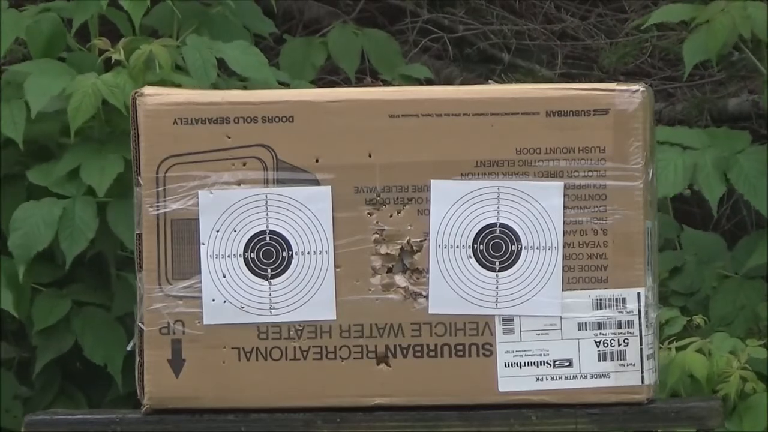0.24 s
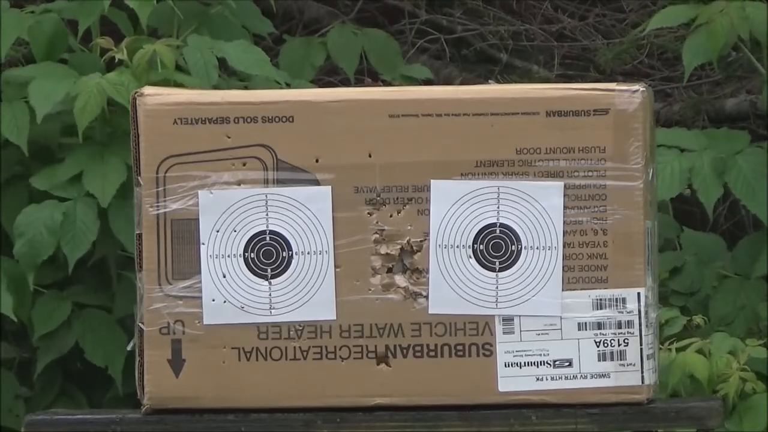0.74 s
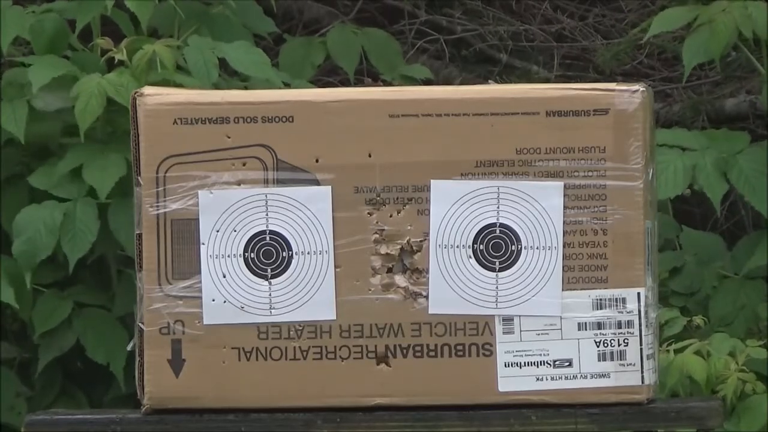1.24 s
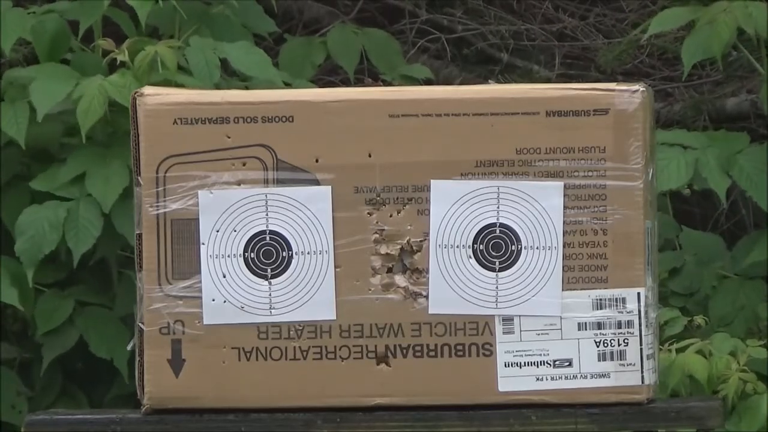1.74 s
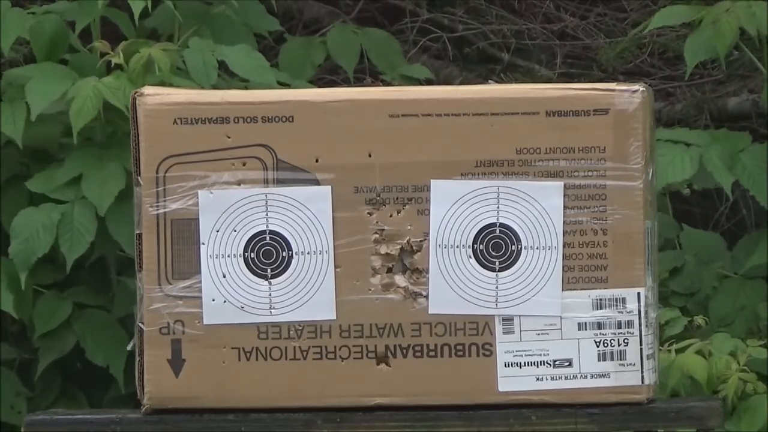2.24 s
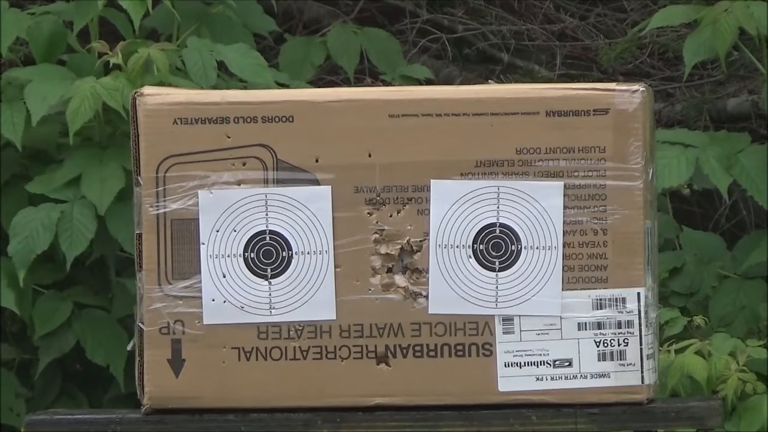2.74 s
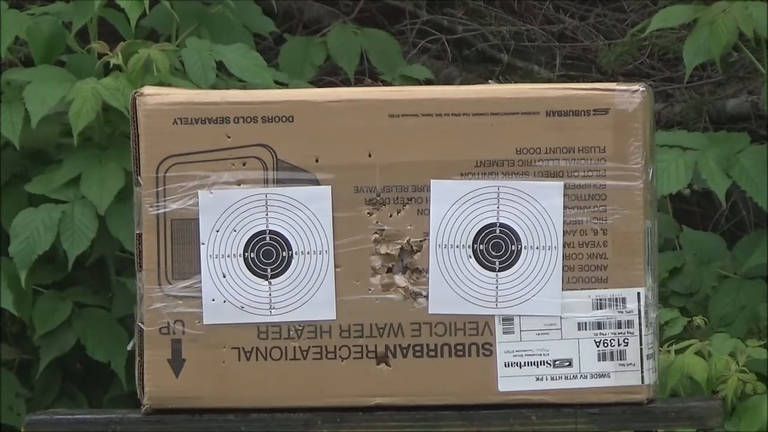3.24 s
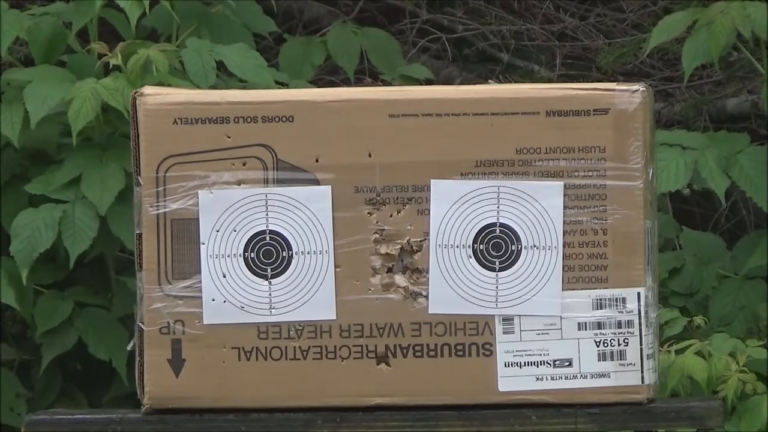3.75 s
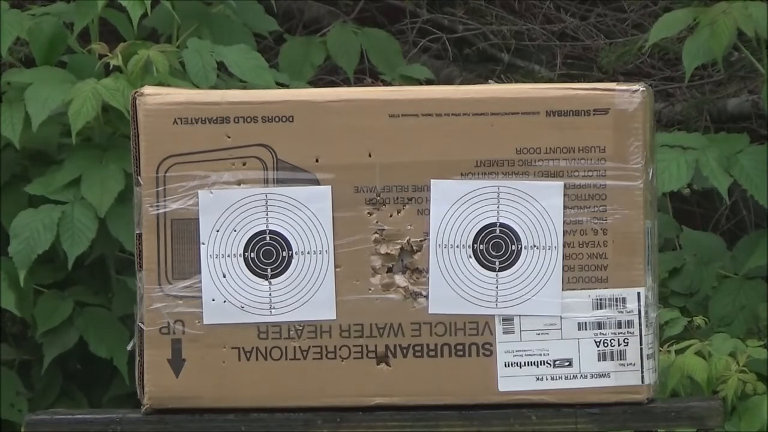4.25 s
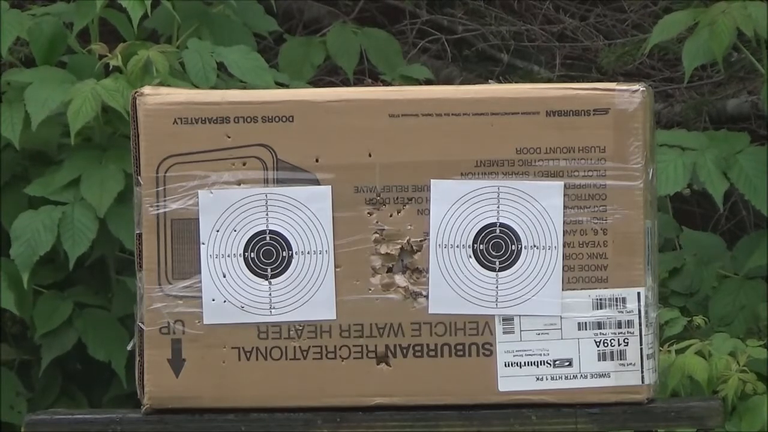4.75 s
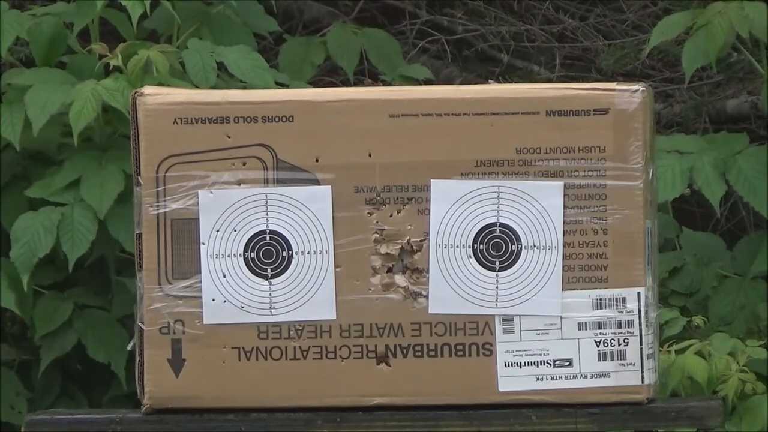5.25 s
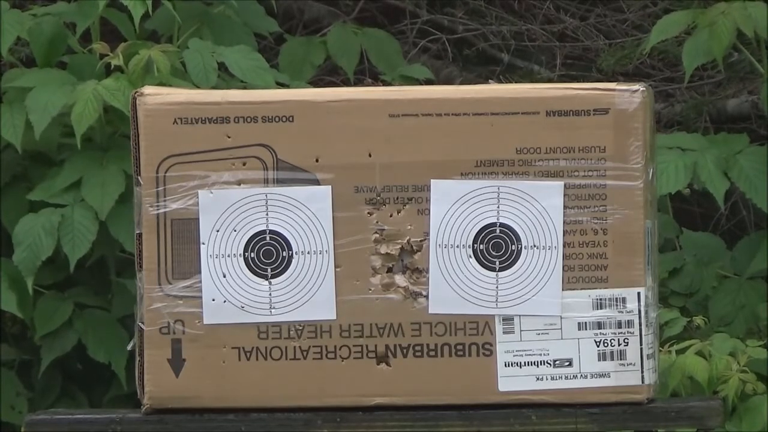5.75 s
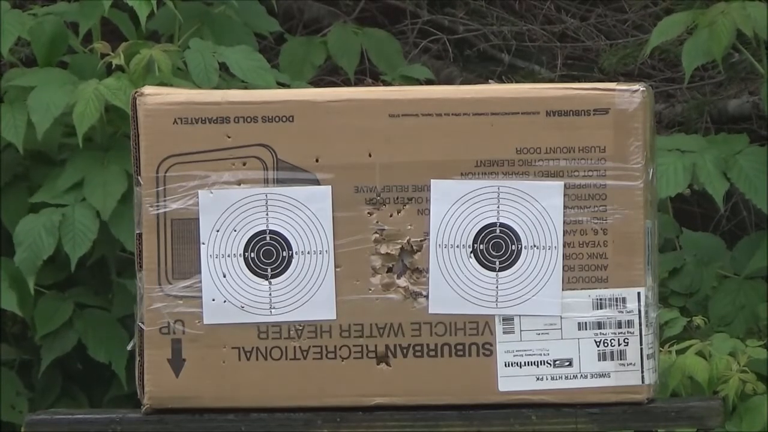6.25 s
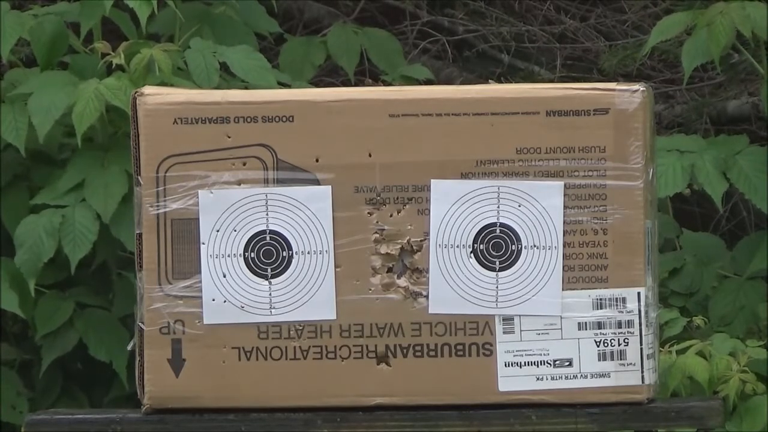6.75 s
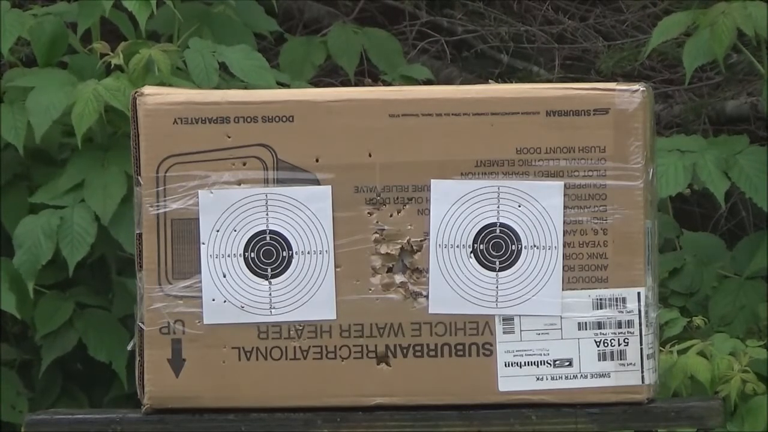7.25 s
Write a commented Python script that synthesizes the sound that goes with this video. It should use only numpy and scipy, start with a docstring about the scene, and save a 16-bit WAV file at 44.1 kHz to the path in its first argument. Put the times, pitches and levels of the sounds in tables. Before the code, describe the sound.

A gas BB gun, heard close up, shoots six times at a cardboard box outdoors: three steady shots, a pause, then three faster ones. Each goes from a small trigger click to a crisp pop of gas and steel, then a hard cardboard smack that echoes briefly off a wall and trees. Light trigger clacks and a faint hush of distant trees fill the gaps.

```python
"""A gas BB gun, close by, fires at a cardboard box in a leafy garden. An earlier shot dies away; six follow.
Each time the trigger clicks, the hammer lets go and strikes the valve, gas pops from the muzzle and the
hammer bounces. The BB slaps the box, a wall on the left returns the slap, and the trigger clacks back.
Nearby surfaces echo, leaves and trees scatter the sound, and a faint hush fills the gaps."""
import sys
import numpy as np
from scipy import signal
from scipy.fft import rfft, irfft, next_fast_len
from scipy.io import wavfile
from scipy.ndimage import uniform_filter1d, minimum_filter1d, map_coordinates

SR = 44100
rng = np.random.default_rng(int(sys.argv[2]) if len(sys.argv) > 2 else 0)


def transcribe(u):
    """Save the signal u as a 16-bit wav file named by the first command-line argument.

    u: samples, shape (n,) or (channels, n), limited to [-1, 1]; the rate is SR.
    q: integer samples, one column per channel.
    """
    v = np.clip(np.atleast_2d(u).T, -1, 1)
    q = np.round(v * 32767).astype(np.int16)
    wavfile.write(sys.argv[1], SR, q)


N = 331191

# Each BB hits another spot. Each row: report time in seconds, slap gain in dB, hollow panel boost in dB,
# stiff face boost in dB, paper snap in Hz, top boost in dB, gain to the wall in dB, its face boost in dB.
SHOTS = [(-.1237, 2.5, -4, -5, 4960, 6.5, 2.5, -13), (1.5942, 4, 3, 6.5, 6170, 9.5, 2, 9),
         (2.5885, 4.5, 1.5, 6, 6270, 3, 5, 5), (3.6285, 3.5, 5.5, 1, 10900, 11.5, 4, 2.5),
         (6.0773, 2, 8, 6, 5540, 12, 3.5, -6), (6.7524, 6, 5, 6, 4400, 7, 7.5, -5),
         (7.42, 5, 4, 0, 6000, 4, 4, -6)]
# Hammer release, valve strike, gas in the barrel, report, settling.
# Each row: lag from the report in seconds, steel in dB, gas in dB, t60 in seconds.
FIRING_CYCLE = [(-.0165, -21, -16, .07), (-.0058, -6.5, -24, .004), (-.0032, -12, -9, .018),
                (0, 0, -6, .001), (.0638, -28, -17, .007)]
# Body and barrel. Each row: frequency in Hz, relative energy in dB, t60 in seconds.
GUN_MODES = [(600, -18, .09), (1260, -22, .08), (1580, -16, .08), (2235, -19, .06), (5235, -22, .08),
             (6790, -17, .07), (7635, -17, .07), (8218, -11, .07), (8790, -12, .07), (9470, -17, .06),
             (10285, -18, .06)]
# Steel contact, gas puff, near and far scatter. Each row: frequency in Hz, relative level in dB.
STEEL_SPECTRUM = [(100, -27), (1500, -19), (4000, -13), (5200, -3.5), (7000, -1), (8300, -0.5),
                  (10300, -1.5), (12000, -9), (13500, -24), (16000, -27)]
GAS_SPECTRUM = [(30, -23), (150, -20.5), (320, -13.5), (620, 2.5), (850, -3), (1500, 3.5), (1900, -1.5),
                (2300, 0.5), (3200, -1.5), (4200, -10.5), (8000, -9), (15000, -28)]
NEAR_SPECTRUM = [(100, -32.5), (500, -8), (1200, -13.5), (3000, 1), (4500, 3), (8500, 10), (10500, 6),
                 (12500, -0.5), (16000, -28)]
FAR_SPECTRUM = [(60, -65), (200, -16), (450, -16), (1000, 3.5), (2300, 5.5), (3800, 1), (6000, -1.5),
                (9000, -11.5), (12000, -26), (16000, -12)]

def firing(gain_db=6):
    """Steel contacts and gas puffs ring the gun; returns direct sound and scatter."""
    direct, tails = np.zeros(N), np.zeros((2, N))
    for s, *_ in SHOTS:
        for lag_s, steel_db, gas_db, t60 in FIRING_CYCLE + hammer_bounces():
            steel = amp(steel_db) * colour(burst(t60), STEEL_SPECTRUM)
            gas = amp(gas_db) * colour(burst(t60), GAS_SPECTRUM)
            add(direct, s + lag_s, amp(gain_db) * (steel + gas))
        add(direct, s, amp(gain_db - 1) * ring(GUN_MODES))
        add(tails, s - .004, amp(gain_db - 3.5) * scatter(NEAR_SPECTRUM, .00038, t60=.26, side_db=-9))
        add(tails, s, amp(gain_db - 8) * scatter(FAR_SPECTRUM, .072, t60=.41, side_db=-6.5))
    return direct, tails

def hammer_bounces(first_s=.0062, gap_s=.0154, shrink=.615, loss_db=5, steel_db=-6.5, gas_db=-10):
    """The hammer rebounds, each time sooner and softer; rows as in FIRING_CYCLE."""
    rows = []
    for k in range(4):
        lag_s = first_s + gap_s * (1 - shrink ** k) / (1 - shrink)
        rows.append((lag_s, steel_db - loss_db * k, gas_db - loss_db * k, .0021))
    return rows

# Each row: time of a pull in seconds, gain in dB.
TRIGGER_PULLS = [(1.061, -20), (2.2183, -22), (3.4517, -22.5), (5.6067, -21), (6.6921, -22.5),
                 (7.3469, -22.5)]
# Each entry: time of the spring's return in seconds.
TRIGGER_RESETS_S = [.1127, 1.8023, 2.8275, 3.8678, 6.3164, 6.9719]
# Steel ping. Each row: frequency in Hz, relative energy in dB, t60 in seconds.
TRIGGER_MODES = [(2110, -12, 0.025), (2430, -14, 0.016), (5520, -11, 0.025), (7380, -7, 0.04)]
# Pull and return. Each row: frequency in Hz, relative level in dB.
PULL_SPECTRUM = [(100, -37), (450, -43), (650, 0), (900, -8), (1800, -2), (2200, 3), (2900, -2.5),
                 (5150, -3), (5700, 8), (6200, -1), (7300, 2.5), (10500, 1.5), (12500, -9), (16000, -27)]
SPRING_SPECTRUM = [(100, -39), (600, -14), (950, -13), (1200, 5), (1600, -8.5), (2600, 1), (4000, -10),
                   (5500, -7.5), (9000, -6.5), (12000, -19), (16000, -41)]

def trigger():
    """The trigger scrapes, clicks and pings, then springs back with a duller clack."""
    direct, tails = np.zeros(N), np.zeros((2, N))
    for s, db in TRIGGER_PULLS:
        add(direct, s - .004, amp(db - 4.5) * colour(burst(.034, rise_s=.0036), PULL_SPECTRUM))
        add(direct, s - .0007, amp(db + 10.5) * colour(burst(.028, rise_s=.0025), PULL_SPECTRUM))
        add(direct, s + .0006, amp(db + 9.5) * ring(TRIGGER_MODES))
        add(tails, s, amp(db + 2) * scatter(NEAR_SPECTRUM, .00095, t60=.17))
    for s in TRIGGER_RESETS_S:
        add(direct, s, amp(-15) * colour(burst(.029, rise_s=.0007), SPRING_SPECTRUM))
    return direct, tails

# Each row: delay in seconds, bass in dB, treble in dB, smear t60 in seconds.
GUN_ECHOES = [(.0014, -19.5, -5, 0.0019), (.034, -12.5, -33, 0.058), (.0418, -21, -14.5, 0.058)]

def gun():
    """Firing and trigger, with echoes from the bench and walls."""
    shots, shot_tails = firing()
    clicks, click_tails = trigger()
    direct, echoes = shots + clicks, np.zeros(N)
    for delay_s, bass_db, treble_db, t60 in GUN_ECHOES:
        reflection = shelves(burst(t60), bass_db, treble_db, split_hz=3400)
        add(echoes, delay_s, signal.fftconvolve(direct, reflection))
    tails = shot_tails + click_tails
    return spread(direct, direct, side_db=-51) + spread(echoes, echoes, side_db=-31) + tails

# Box panels. Each row: frequency in Hz, relative energy in dB, t60 in seconds.
PANEL_MODES = [(830, -60, 0.031), (1028, -14.5, 0.02), (1210, -35, 0.075), (1565, -10, 0.0032),
               (2070, -33, 0.0083)]
# Cardboard impact and leaf scatter. Each row: frequency in Hz, relative level in dB.
BOX_SPECTRUM = [(30, -29), (130, -19), (260, -6.5), (520, -16.5), (750, -8.5), (1020, -1.5), (1450, 6),
                (1780, -5.5), (2350, 4), (3500, -4), (4800, 4.5), (7000, 0), (10500, -7.5), (13000, -14),
                (15500, -23)]
LEAF_SPECTRUM = [(100, -29.5), (300, 2), (550, -10), (1200, -4), (3500, -2), (6000, 8), (9000, 4),
                 (12000, -13), (16000, -30)]

def box(flight_s=.0912, slowing_s=.00087):
    """The BB snaps and drums the cardboard; leaves, trees and the wall throw the slap back."""
    out = np.zeros((2, N))
    for fired, (shot_s, db, panel_db, face_db, snap_hz, top_db, wall_db, wall_face_db) in enumerate(SHOTS):
        # Flight includes the sound's way back. Each shot cools the gas, slowing the next BB.
        s = shot_s + flight_s + slowing_s * fired
        punch = colour(burst(.0089) + amp(-58) * burst(.15), BOX_SPECTRUM) + ring(PANEL_MODES)
        punch = bell(punch, hz=940, width_hz=510, db=panel_db)
        slap = bell(punch, hz=2200, width_hz=510, db=face_db)
        slap = bell(slap, hz=snap_hz, width_hz=680, db=9.5)
        slap = amp(db - 1.5) * bell(slap, hz=9500, width_hz=2040, db=top_db)
        add(out, s, spread(slap, slap, side_db=-47))
        add(out, s, amp(db - 7) * scatter(LEAF_SPECTRUM, .0029, t60=.38, side_db=-8.5))
        add(out, s, amp(db - 16) * scatter(FAR_SPECTRUM, .015, t60=1, side_db=-8))
        sideways = bell(punch, hz=2210, width_hz=540, db=wall_face_db)
        add_wall_echoes(out, s, sideways, wall_db, slap_db=db)
    return out

# Each row: delay in seconds, gain in dB, smear t60 in seconds.
WALL_ECHOES = [(0.0354, -8, 0.0022), (0.0392, -13.5, 0.0082)]
# Wall reflection and its blur. Each row: frequency in Hz, relative level in dB.
WALL_SPECTRUM = [(100, -4.5), (550, -2), (1000, 2), (1500, -1), (2200, 8), (3000, 7.5), (4000, 3.5),
                 (6000, -7.5), (9000, 3), (14000, -7)]
BLUR_SPECTRUM = [(30, -36), (120, -30), (240, -8.5), (380, -30.5), (560, -11.5), (1000, -5), (1400, -6),
                 (2200, 0.5), (3000, -10), (4000, -3), (6000, -10.5), (9000, -10), (12000, -16.5),
                 (15500, -38)]

def add_wall_echoes(out, s, slap, wall_db, slap_db):
    """The left wall returns the slap twice, blurred by its rough face and plants; trees scatter it."""
    for delay_s, echo_db, t60 in WALL_ECHOES:
        gain = amp(wall_db + echo_db)
        echo = colour(signal.fftconvolve(slap, burst(t60)), WALL_SPECTRUM)
        add(out, s + delay_s, gain * spread(echo, echo, side_db=-6.5))
        blur = scatter(BLUR_SPECTRUM, .0064, t60=.063, side_db=-11.5) * amp([[1.5], [-1.5]])
        add(out, s + delay_s - .004, gain * blur)
        trees = scatter(FAR_SPECTRUM, .0024, t60=.67, side_db=-8.5)
        add(out, s + delay_s, amp(slap_db + echo_db - 4.5) * trees)

# Background hush. Each row: frequency in Hz, relative level in dB.
AIR_SPECTRUM = [(25, -30), (70, -22.5), (150, -7.5), (300, -3.5), (600, 0.5), (1000, 1.5), (1800, -2),
                (3200, -2.5), (6000, -7.5), (7700, -8), (8700, -7.5), (10000, -11.5), (15500, -18.5)]

def air(gain_db=-58):
    """Distant trees hush, wavering slightly; narrower in the treble."""
    t = np.arange(N) / SR
    mid, side = [colour(noise, AIR_SPECTRUM) for noise in rng.standard_normal((2, N))]
    waver_db = 1.15 * map_coordinates(rng.standard_normal(N // 1000), [t * 4])
    side = shelves(side, bass_db=.5, treble_db=-47.5, split_hz=5200)
    return amp(gain_db + waver_db) * spread(mid, side, side_db=-3.5)

def burst(t60, rise_s=0):
    """A crackle with an even spectrum that swells and dies; energy 1."""
    t = np.arange(1, SR // 4 + 1) / SR
    fade = amp(-60 * t / t60) * (1 - np.exp(-t / max(rise_s, 1 / SR)))
    phase = np.angle(rfft(fade * rng.standard_normal(len(t))))
    crack = irfft(np.exp(1j * phase), len(t)) * np.sqrt(fade)
    return crack / np.linalg.norm(crack)

def ring(modes):
    """Damped modes whose levels vary a little at every blow."""
    t = np.arange(SR // 4) / SR
    out = np.zeros(len(t))
    for hz, db, t60 in modes:
        mode = np.cos(2 * np.pi * hz * t) * amp(-60 * t / t60)
        out += amp(db + rng.normal(0, .56)) * mode / np.linalg.norm(mode)
    return out

def scatter(spectrum, rise_s, t60, side_db=-11):
    """Countless small reflections arrive in clumps, build up and die away; stereo."""
    t = np.arange(SR) / SR
    clumps_db = 3.2 * map_coordinates(rng.standard_normal(SR // 40), [t * 250])
    envelope = (1 - np.exp(-t / rise_s)) * amp(clumps_db - 60 * t / t60)
    envelope /= np.linalg.norm(envelope)
    mid, side = [colour(noise * envelope, spectrum) for noise in rng.standard_normal((2, SR))]
    return spread(mid, side, side_db)

def colour(x, spectrum, size=8192):
    """Minimum-phase filter through (Hz, dB) points; keeps the energy of white noise."""
    hz, db = np.transpose(spectrum)
    gain = amp(np.interp(np.log(np.fft.rfftfreq(size, 1 / SR) + 1), np.log(hz), db))
    cepstrum = irfft(np.log(gain))
    cepstrum[1:size // 2] *= 2
    cepstrum[size // 2 + 1:] = 0
    pulse = irfft(np.exp(rfft(cepstrum)))[:size // 2]
    return signal.convolve(x, pulse / np.linalg.norm(pulse))[:len(x)]

def bell(x, hz, width_hz, db):
    """Raise or lower one resonance."""
    band = signal.lfilter(*signal.iirpeak(hz, hz / width_hz, fs=SR), x)
    return x + (amp(db) - 1) * band

def shelves(x, bass_db, treble_db, split_hz):
    """Separate gains below and above the split."""
    bass = signal.lfilter(*signal.butter(1, split_hz, fs=SR), x)
    return amp(bass_db) * bass + amp(treble_db) * (x - bass)

def spread(mid, side, side_db):
    """Mid and side to left and right."""
    return np.array([mid + amp(side_db) * side, mid - amp(side_db) * side])

def amp(db):
    """Decibels to gain."""
    return 10 ** (np.asarray(db) / 20)

def add(track, s, sound):
    """Mix a sound into the track from s seconds on."""
    start = round(s * SR)
    first, last = np.clip([start, start + sound.shape[-1]], 0, N)
    track[..., first:last] += sound[..., first - start:last - start]

def scene():
    """Gun, target and garden together."""
    return gun() + box() + air()

def record(dry):
    """A fast limiter turns down the cracks; a low-pass cuts at 16.3 kHz."""
    needed_gain = 1 / np.maximum(np.abs(dry).max(axis=0), 1)
    gain = uniform_filter1d(minimum_filter1d(needed_gain, size=65), size=65)
    size = next_fast_len(N + SR // 4)
    passband = np.fft.rfftfreq(size, 1 / SR) < 16300
    return irfft(rfft(dry * gain, size) * passband, size)[:, :N]

dry = scene()
out = record(dry)
transcribe(out)
```